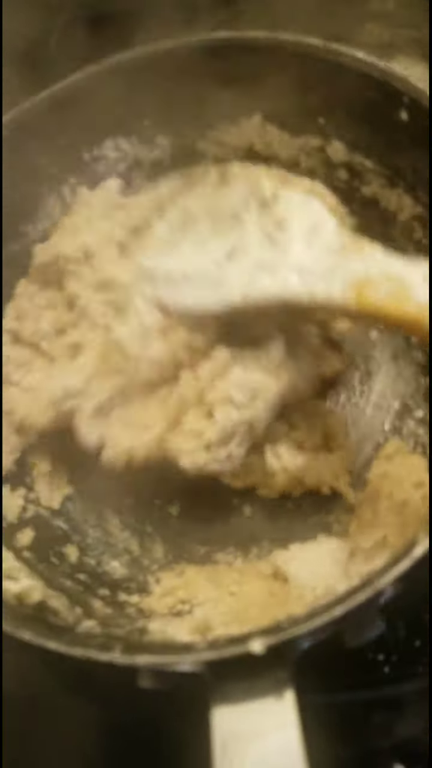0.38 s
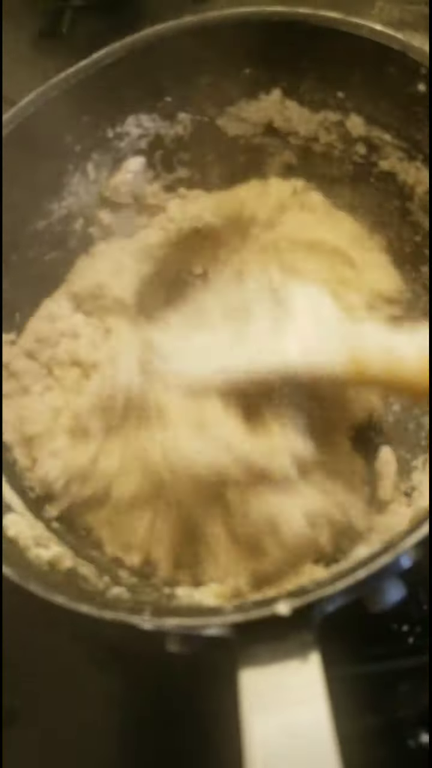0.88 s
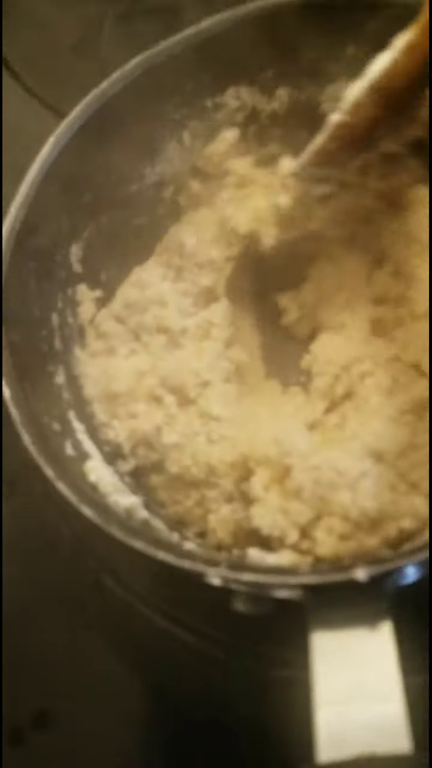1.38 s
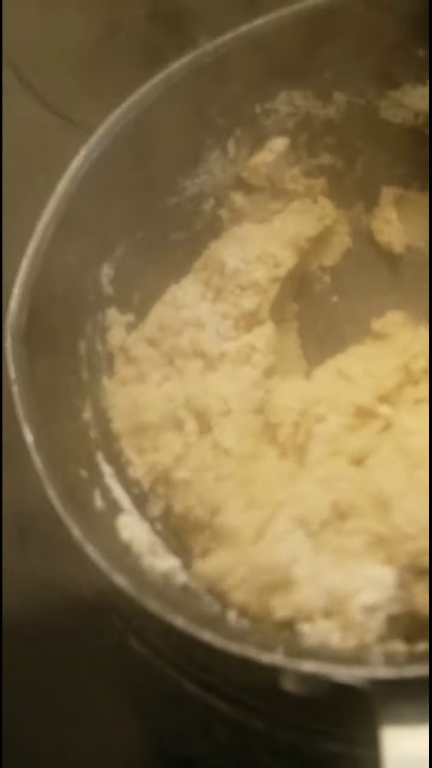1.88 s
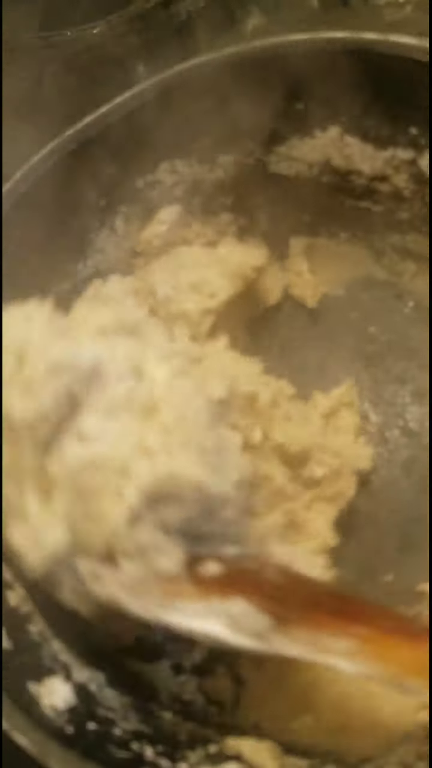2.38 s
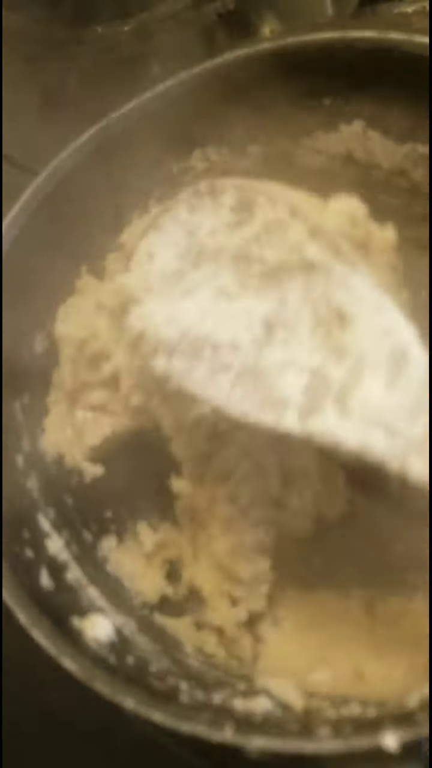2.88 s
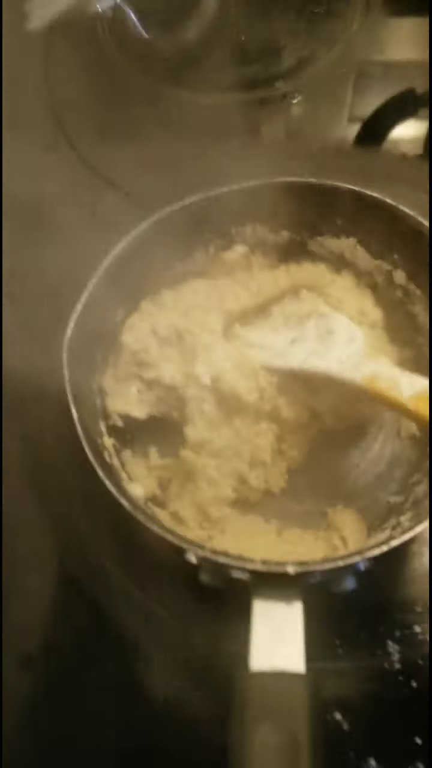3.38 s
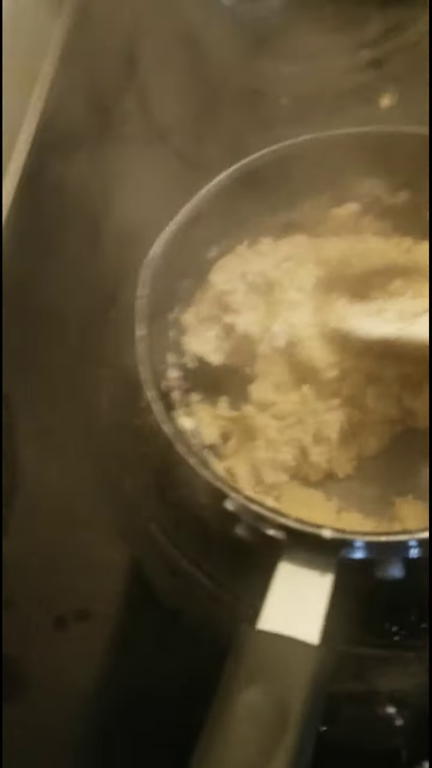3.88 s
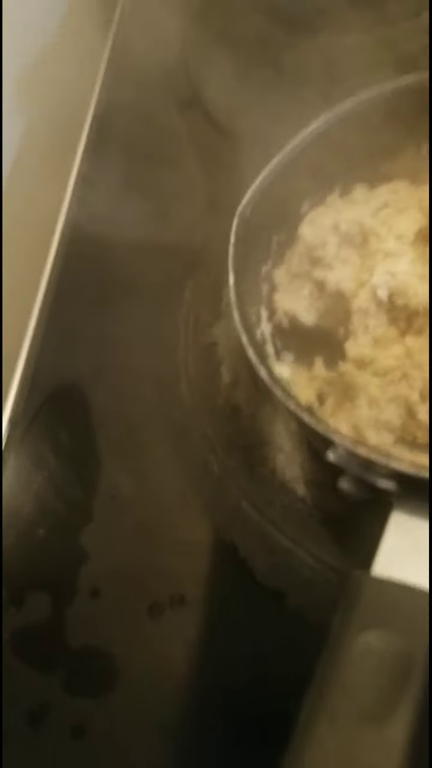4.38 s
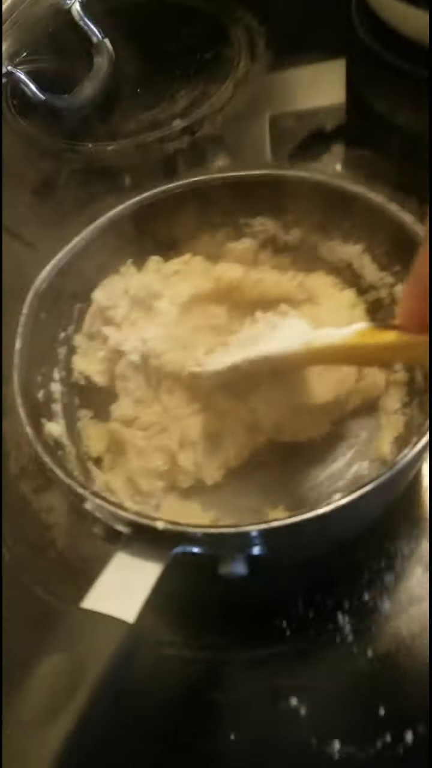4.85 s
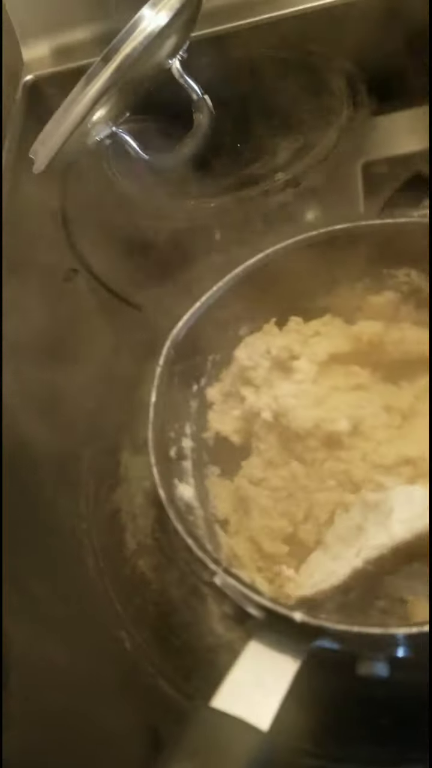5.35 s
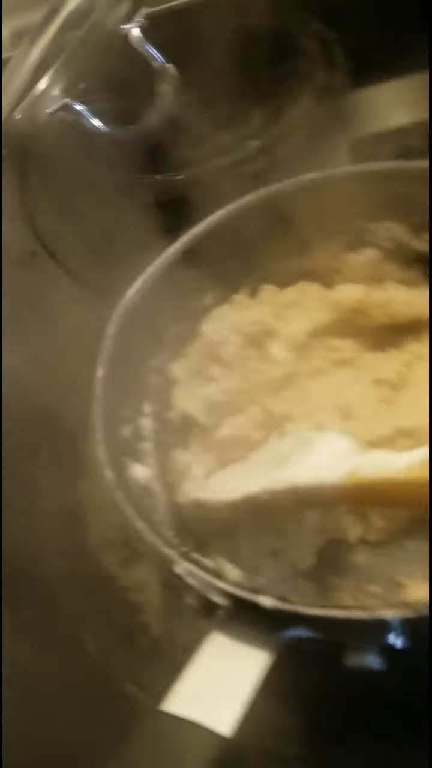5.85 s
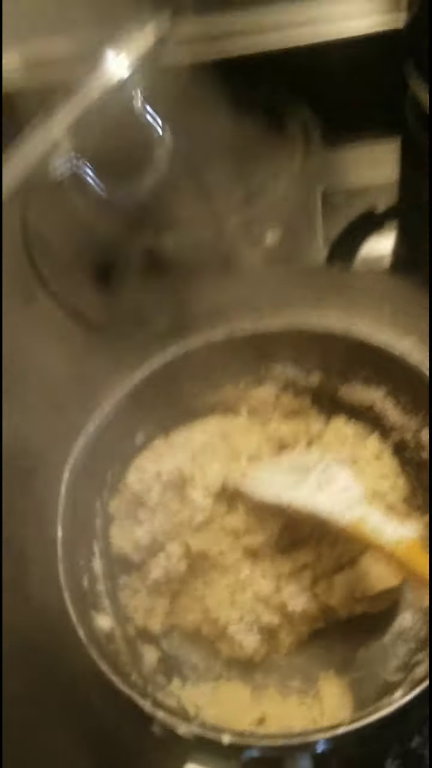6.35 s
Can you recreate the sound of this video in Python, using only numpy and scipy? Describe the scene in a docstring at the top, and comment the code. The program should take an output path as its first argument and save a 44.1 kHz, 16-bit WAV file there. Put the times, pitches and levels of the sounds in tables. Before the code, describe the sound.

A wooden spatula knocks a small ringing steel saucepan in uneven clusters, scraping through a sizzling thick mixture over a low extractor fan hum.

```python
"""Stirring a thick, hot mixture

A wooden spatula knocks on a small steel saucepan on a glass hob, each blow ringing the pan's modes
in a wash of rattle. The blade scrapes the bottom as dense slips coloured by the pan.
The mixture sizzles as thousands of tiny bursts, with single louder spits. Behind it an extractor fan
hums on the orders of its rotor over a rush of air. A small stereo microphone pair is close above."""
import sys
import numpy as np
from scipy import signal
from scipy.io import wavfile

SR = 44100
rng = np.random.default_rng(int(sys.argv[2]) if len(sys.argv) > 2 else 0)


def invert_db(x):
    """Field ratio 10**(x/20) for x, a level in decibels (scalar or array-like)."""
    u = np.asarray(x, float) / 20
    return 10 ** u


def digitize_waveform(pressure):
    """Quantize a signal to 16-bit integers and store it at the path in sys.argv[1].

    Rows of a 2-D input are taken as channels; values are limited to [-1, 1].
    """
    field = np.atleast_2d(pressure).T
    bounded = np.clip(field, -1, 1)
    quanta = np.round(bounded * 32767).astype(np.int16)
    wavfile.write(sys.argv[1], SR, quanta)


N = 297127   # length in samples

EDGES = 28 * 2 ** np.arange(0, 9.4, .4)   # band edges in Hz, 0.4 octave apart
CENTRES = np.sqrt(EDGES[1:] * EDGES[:-1])
PAN_LAG_S = .00011   # the pan is heard this much later on the right


def rms_one(x):
    """Scales a signal to rms 1."""
    return x / np.sqrt(np.mean(x ** 2) + 1e-20)


def in_time(rows):
    """Draws the columns of a timed curve sample by sample."""
    s, *columns = np.transpose(rows)
    return [np.interp(np.arange(N) / SR, s, column) for column in columns]


def at_hz(points, hz):
    """Reads a table on a log-frequency axis."""
    table_hz, values = np.transpose(points)
    return np.interp(np.log(hz), np.log(table_hz), values)


def every_sample(slow):
    """Fills in between values given at every 40th sample."""
    return np.interp(np.arange(N) / 40, np.arange(len(slow)), slow)


def drift(rate_hz):
    """Slow random wander of spread 1: noise through two equal low-pass poles."""
    r = np.exp(-80 * np.pi * rate_hz / SR)
    white = rng.standard_normal(N // 40 + 2002)
    slow = signal.lfilter([1], [1, -2 * r, r * r], white)[2000:]   # without the filter's start
    return every_sample(rms_one(slow))


def grains(per_s, spread_db):
    """Four unrelated trains of random clicks of uneven size, rms 1."""
    uneven_db = spread_db * np.minimum(rng.exponential(1, (2, 2, N)), 5)
    sizes = invert_db(uneven_db) * rng.standard_normal((2, 2, N))
    return rms_one(sizes * (rng.random((2, 2, N)) < per_s / SR))


def later(x, s):
    """Delays x by s seconds."""
    return np.interp(np.arange(N) - s * SR, np.arange(N), x)


def bands(white, likeness, lag_s):
    """Stereo bands of a white source; the right side is partly a late copy of the left."""
    for k, edges in enumerate(zip(EDGES, EDGES[1:])):
        sos = signal.butter(2, edges, "band", fs=SR, output="sos")
        left, other = signal.sosfilt(sos, white[k % 2])   # neighbouring bands are unrelated
        alike = np.clip(at_hz(likeness, CENTRES[k]), 0, 1)
        right = alike * later(left, lag_s) + np.sqrt(1 - alike ** 2) * other
        yield CENTRES[k], np.array([left, right])


def ring(drive, hz, t60):
    """Two-pole resonator: a unit click sets a dying sine of height 1 ringing."""
    r, w = invert_db(-60 / (t60 * SR)), 2 * np.pi * hz / SR
    return signal.lfilter([0, np.sin(w)], [1, -2 * r * np.cos(w), r * r], drive + 1e-18)


def panned(pan_db):
    """Left and right gains for a left-over-right difference in dB."""
    return invert_db(np.array([[.5], [-.5]]) * pan_db)


def swells(rows, rise_db_per_s):
    """Power of each event at every 40th sample: steady rise, hold, steady release."""
    s, db, hold, release = np.transpose(rows)[:4, :, None]
    t = np.arange(N // 40 + 2) * 40 / SR - s
    return invert_db(db + rise_db_per_s * np.minimum(t, 0) - release * np.maximum(t - hold, 0)) ** 2


# Blows of the spatula. Each row: start in seconds (before the short delay ONSET_DELAY_S), level in dB,
# thud in dB against the level, hardness in dB against the level, length factor of the ringing.
KNOCKS = [(0.141, -18, -11, -2, 0.15), (0.157, -27.5, -8, -11, 0.51), (0.465, -42.5, -0.5, -26, 0.57),
          (0.532, -37, -2, -33, 0.99), (0.717, -46, 11, -20, 0.3), (0.871, -21.5, -15, -2.5, 0.4),
          (0.923, -47.5, -1, 1, 0.51), (1.019, -34, 0.5, -12, 0.62), (1.032, -38.5, 2.5, -3.5, 0.88),
          (1.073, -19, -11, -14, 0.69), (1.081, -18.5, -5.5, 1, 0.2), (1.357, -27.5, -9.5, -28, 0.65),
          (2.03, -63.5, 14.5, -11, 0.67), (2.296, -51.5, 2, 3, 0.6), (2.866, -33, -9.5, -9.5, 0.63),
          (3.191, -52, 6, -26, 0.29), (3.26, -33.5, -31, -5, 0.14), (3.497, -47, -8, -21, 0.93),
          (3.795, -12, -12.5, -1, 0.69), (3.821, -13.5, -10.5, 1, 0.31), (3.887, -38.5, -6, -1, 0.96),
          (4.118, -17.5, -8.5, 0, 0.47), (4.14, -22.5, -13, -5.5, 0.25), (4.89, -49.5, -4, 1, 0.26),
          (5.364, -34.5, -12, -16, 0.55), (5.384, -30, 3.5, -12.5, 0.43), (5.948, -55, -16.5, 6.5, 0.37),
          (6.518, -40.5, -5, -0.5, 0.21), (6.601, -33, -7.5, -20, 0.86), (6.665, -13, -8, -2, 0.69),
          (6.6747, -19, -11, -0.5, 0.57), (6.699, -16, -23, -12, 0.69)]
# Hard blows that ring free of the mixture crack most; blows cushioned by it are dull.
CRACK_DB, CRACK_PER_HARDNESS, CRACK_PER_LENGTH_DB, CRACK_PER_THUD = -13.5, 2.36, 15, 0.53


def blow_db(hz):
    """Strength of every knock at one pitch: soft blows are all thud, hard ones crack."""
    strength_db = []
    for s, db, thud, hard, length in KNOCKS:
        crack_db = CRACK_DB + CRACK_PER_HARDNESS * hard + CRACK_PER_LENGTH_DB * length - CRACK_PER_THUD * thud
        spectrum = [(170, thud + 8), (550, 0), (1800, hard + 2), (7000, crack_db)]
        strength_db.append(db + at_hz(spectrum, hz))
    return np.array(strength_db)


# Ringing modes of the pan, also stirred by the scrape. Each row: pitch in Hz, level in dB, T60 in seconds.
PAN_MODES = [(152.4, 18.5, 0.099), (231, 12, 0.27), (303, -3, 0.54), (355.7, 13, 0.24), (398, -16, .2),
             (474.7, 12, 0.35), (491.3, 14, 0.3), (584, 3.5, 0.25), (680, 5.5, 0.5), (805, 3.5, 0.55),
             (875, -6, 0.35), (980, -21, .1), (1093, -6.5, 0.11), (1355, -1, 0.63), (1580, -4, 0.11),
             (1811, 11.5, 0.067), (1741, 15.5, 0.19), (1970, 9, 0.15), (2008, 16.5, 0.089),
             (2380, -2, 0.092), (2490, 3.5, 0.23), (2800, -1, 0.25)]
# Spectrum of the blows. Each row: pitch in Hz, level in dB.
KNOCK_COLOUR = [(47, -38.5), (80, -8.5), (227, -0.5), (303, -6), (482, -8.5), (538, -7), (702, -9.5),
                (1000, -12.5), (1990, -12), (3100, -18.5), (13100, -29), (15000, -33.5), (16000, -54)]
# Decay of the rattling wash. Each row: pitch in Hz, T60 in seconds before the length factor.
KNOCK_DECAY = [(100, 0.36), (300, 0.29), (1000, 0.35), (3000, 0.28), (8000, 0.18), (15000, 0.17)]
# Width of the pan's sounds. Each row: pitch in Hz, left-right likeness from 0 to 1.
NEAR_LIKENESS = [(100, 1), (500, 0.64), (1500, 0.067), (8000, 0.14)]
# Balance of knocks and scrape. Each row: pitch in Hz, left over right in dB.
PAN_BALANCE = [(60, 4), (110, -3), (200, -6.5), (380, 1), (700, -4), (1290, -3), (2380, 4), (4400, 0.5),
               (8120, 6.5), (15000, 1)]
ONSET_DELAY_S = .0015   # every blow sounds this long after its listed start
ROOM_DB, ROOM_T60_S = -16, 0.52
MODE_CHANCE_DB = 2.0   # random spread of each mode's level


def knocks():
    """Each blow is a sharp pulse that rings the modes and rattles pan and hob: a wash dying band by band."""
    t = np.arange(SR // 2) / SR
    out, rung = np.zeros((2, N)), np.zeros((2, N + len(t)))
    at = [round((row[0] + ONSET_DELAY_S) * SR) for row in KNOCKS]
    length = np.array(KNOCKS)[:, 4]
    room = invert_db(ROOM_DB - 60 * t / ROOM_T60_S)
    for k, (hz, noise) in enumerate(bands(rng.standard_normal((2, 2, N)), NEAR_LIKENESS, PAN_LAG_S)):
        power, clicks = np.zeros(N + len(t)), np.zeros((2, N))
        rise = 1 - np.exp(-t * hz / 0.74)   # lows take a cycle or two to build
        crack = 1.93 * np.exp(-t / 0.0039) * np.clip(hz / 1200, 0, 1)   # the dry wooden tap
        strength_db = blow_db(hz)
        for i, db, factor in zip(at, strength_db, length):
            wash = invert_db(-60 * t / (factor * at_hz(KNOCK_DECAY, hz)))
            power[i:i + len(t)] += (invert_db(db) * rise * (wash + room + crack)) ** 2
        clicks[:, at] = invert_db(strength_db + 19.5) * (-1) ** k
        pulse = ring(clicks, hz, 13.8 / hz) * hz / SR   # first contact, a few cycles long
        pulse[1] = later(pulse[1], PAN_LAG_S)
        side = panned(at_hz(PAN_BALANCE, hz))
        out += invert_db(at_hz(KNOCK_COLOUR, hz) + 17.5) * side * (np.sqrt(power[:N]) * noise + pulse)

    hz, level_db, t60 = np.transpose(PAN_MODES)[:, :, None]
    luck = rng.standard_normal((len(at), 4, len(PAN_MODES), 1))
    strength_db = np.transpose([blow_db(mode[0]) for mode in PAN_MODES])[:, :, None]
    for i, db, factor, (loud, sign, pitch, apart) in zip(at, strength_db, length, luck):
        start_db = db + level_db - 18.5 + MODE_CHANCE_DB * loud
        fading = invert_db(start_db - 60 * t / (factor * t60))   # the mixture damps some blows more
        phase = 2 * np.pi * hz * (1 + .006 * pitch) * t
        lag = 2 * np.pi * hz * PAN_LAG_S + apart * hz / 900   # sides differ more in phase at high modes
        rung[:, i:i + len(t)] += np.sum(np.sign(sign) * fading * np.sin([phase, phase - lag]), axis=1)
    return out + rung[:, :N]


# Strokes of the blade. Each row: full pressure at seconds, level in dB, hold in seconds,
# release in dB per second, brightness in dB per octave.
STROKES = [(0.0, -54, 0.0042, 210.5, 7), (0.129, -49, 0.0071, 39.5, 2.5), (0.331, -54, 0.0044, 153, 3),
           (0.424, -47, 0.0075, 35, 1.5), (0.658, -41.5, 0.0026, 403, -1.2), (0.721, -46, 0.0018, 135, 0.5),
           (0.846, -49, 0.019, 61.5, 4.5), (1.052, -32.5, .15, 331.5, 1), (1.281, -52.5, 0.039, 83, 3.5),
           (1.463, -44.5, 0.0045, 162, 2.5), (1.732, -48.5, 0.0086, 70.5, 1), (1.979, -51, .24, 57, 4),
           (2.276, -49, .005, 99.5, 2.5), (2.429, -52.5, 0.076, 74.5, -1.5),
           (2.924, -55.5, 0.048, 40.5, 6.5), (3.274, -53, 0.14, 217, 6.3), (3.584, -52, 0.0022, 281.5, 4),
           (3.755, -56, 0.012, 65, -6), (4.564, -54, .05, 50.5, 0.5), (4.705, -48, 0.0065, 159, 2),
           (4.845, -55.5, 0.036, 54, 2.5), (4.937, -42, 0.035, 251.5, 1.5), (5.033, -52, .05, 101.5, -1),
           (5.145, -55.5, .045, 200, -8), (5.794, -59, 0.07, 406, 12.5), (5.955, -46.5, 0.034, 300, 9),
           (6.007, -40, .04, 108.5, 2.5), (6.15, -54.5, 0.091, 87, -2.5), (6.367, -44, 0.017, 301.5, 0.2),
           (6.424, -38.5, .04, 149, -1.9), (6.463, -42, 0.027, 259, -11.5)]
# Shared level curve of light drag, simmer and fan. Each row: time in seconds, level in dB.
HEARD = [(0.0, 2.5), (0.25, -0.5), (0.4, 0.5), (1.5, 0), (2.0, -1), (2.4, -0.1), (3.77, 0.1), (3.9, -0.5),
         (4.7, -8.5), (6.2, -5), (6.58, -0.5)]
STROKE_RISE_DB_PER_S, BRIGHT_RISE_DB_PER_S = 232.5, 26   # bright strokes bite faster
DRAG_DB, DRAG_BRIGHTNESS_DB, DRAG_WANDER_DB = -56.5, -2, 3.5   # the blade drags lightly between strokes
RUB_HZ, RUB_SINKS_HZ_PER_DB, RUB_WANDER_HZ = 1778, 20.5, 69.77   # the rub drops in pitch under pressure


def pressure():
    """Scrape level, brightness and rub pitch from the strokes over the light drag."""
    brightness = np.array(STROKES)[:, 4]
    rise = STROKE_RISE_DB_PER_S + BRIGHT_RISE_DB_PER_S * np.maximum(brightness[:, None], 0) ** 1.4
    power = swells(STROKES, rise)
    drag = invert_db(DRAG_DB + in_time(HEARD)[0] + DRAG_WANDER_DB * drift(5.84)) ** 2
    total = every_sample(power.sum(axis=0)) + drag
    tilt_db = (every_sample(brightness @ power) + DRAG_BRIGHTNESS_DB * drag) / total   # weighted by power
    level_db = 10 * np.log10(total)
    rub_hz = RUB_HZ - RUB_SINKS_HZ_PER_DB * (level_db - DRAG_DB) + RUB_WANDER_HZ * drift(5.0)
    return level_db, tilt_db, rub_hz


# Spectrum of the scrape through the pan's bottom. Each row: pitch in Hz, level in dB.
SCRAPE_COLOUR = [(88, -48), (150, -17), (307, -23), (362, -8), (414, -8.5), (473, 7), (638, -16.5),
                 (682, -2), (1300, -3), (4250, -18.5), (8000, -52), (10400, -45), (17600, -120)]
JUDDER_DB, JUDDER_PER_S = 1.14, 77   # the blade catches and lets go
RUB_WIDTH_HZ, RUB_DB, RUB_PER_BRIGHTNESS = 250, -10, 1   # the rub stands out in bright strokes


def scrape():
    """Dense slips of the blade colour through the pan's bottom and keep its modes stirring."""
    level_db, tilt_db, rub_hz = pressure()
    slips, rasp, together = grains(4000, spread_db=0.5), 0, drift(18.0)
    for hz, rub in bands(slips, NEAR_LIKENESS, PAN_LAG_S):
        shape_db = at_hz(SCRAPE_COLOUR, hz) + tilt_db * np.clip(np.log2(hz / 1200), -2.2, 2.2)
        flicker_db = 0.54 * together + 0.75 * drift(4.7)
        rasp = rasp + rub * panned(at_hz(PAN_BALANCE, hz)) * invert_db(shape_db + flicker_db)

    rung = rms_one(sum(invert_db(db) * ring(slips[0, 0], hz, t60) for hz, db, t60 in PAN_MODES))
    rung = np.array([rung, later(rung, PAN_LAG_S)])

    wobble = signal.sosfilt(signal.butter(2, RUB_WIDTH_HZ / 2, fs=SR, output="sos"), slips)
    phase = 2 * np.pi * np.cumsum(rub_hz) / SR   # the rub gathers round one moving pitch
    focus = rms_one(wobble[0] * np.cos(phase) + wobble[1] * np.sin(phase))
    focus_gain = invert_db(RUB_DB + RUB_PER_BRIGHTNESS * tilt_db)

    gain = invert_db(level_db + JUDDER_DB * drift(JUDDER_PER_S))
    return gain * (rms_one(rasp) + focus_gain * focus + invert_db(-4.5) * rung)


# Flares where the hot bottom is bared. Each row: full at seconds, level in dB, hold in seconds,
# release in dB per second.
FLARES = [(0.0, -52.5, 0.023, 40), (0.108, -46.5, 0.043, 52), (0.512, -43.5, 0.017, 43),
          (0.71, -47.5, 0.016, 123), (0.828, -52, .005, 104), (0.944, -52, .02, 60), (1.04, -45, 0.03, 100),
          (1.144, -43.5, 0.022, 116), (1.27, -51.5, 0.096, 49), (1.384, -46.5, 0.0058, 53.5),
          (1.694, -47.5, 0.0048, 113), (1.9, -49.5, 0.12, 142), (2.132, -54, 0.0041, 197),
          (2.266, -51, 0.28, 54.5), (2.904, -48, 0.006, 170), (3.004, -52, 0.0039, 152),
          (3.316, -44.5, .01, 74), (3.51, -70, 0.027, 60), (3.564, -42, 0.006, 126.5),
          (3.704, -55, .02, 120), (4.602, -51.5, 0.0043, 89.5), (4.78, -54, 0.032, 53),
          (4.848, -56.5, 0.0046, 67), (4.944, -54.5, 0.0031, 130), (5.058, -54.5, 0.0082, 174),
          (5.402, -56, 0.0044, 122), (5.794, -58, 0.062, 110), (5.965, -49, .005, 50),
          (6.061, -68, 0.0049, 94), (6.215, -51.5, 0.0044, 75), (6.446, -46, 0.0043, 71),
          (6.655, -49, 0.031, 51)]
# Spectrum of the sizzle. Each row: pitch in Hz, level in dB.
SIZZLE_COLOUR = [(1180, -25), (2000, -7.5), (2300, -6), (2510, -7), (2860, -7.5), (3710, -8), (4380, -14.5),
                 (5030, -3.5), (7190, -8), (9010, -2), (12200, -10), (14900, -8), (16000, -17)]
# Where the sizzle lies. Each row: time in seconds, left over right in dB.
SIZZLE_SIDE = [(0.0, 4.5), (0.45, 9), (1.05, 9.5), (1.35, 4.5), (1.65, 11.5), (1.92, -1), (2.1, 9.5),
               (2.8, 3), (3.15, 10), (3.35, -0.5), (3.7, 2), (4.5, 6), (4.9, 4), (5.75, 6.5), (5.95, 7),
               (6.02, 3.5), (6.7, 1)]
# Bursting droplets. Each row: start in seconds, level in dB, left over right in dB.
SPITS = [(0.633, -31, 19), (0.6603, -31, 17), (0.693, -39, 11), (0.7107, -33.5, 27), (0.7517, -26.5, 7),
         (0.824, -37, -14), (1.433, -30, 7), (1.89, -34, 6), (2.0557, -34, 21), (2.0782, -38, 4),
         (2.092, -26.5, 7), (2.1046, -34, 10), (3.5006, -45, 12), (3.557, -25, 9), (3.5648, -21, -6.5),
         (3.684, -27, -10), (3.706, -20, 6.5), (5.026, -41, 4), (5.0643, -37, 3), (6.0673, -37.5, 16),
         (6.55, -33, -3)]
FLARE_RISE_DB_PER_S, SIMMER_DB = 153, -54


def sizzle():
    """Thousands of tiny bursts at the hot bottom, and a few louder spits of fast-dying noise."""
    (side_db,), (heard_db,) = in_time(SIZZLE_SIDE), in_time(HEARD)
    flare_power = every_sample(swells(FLARES, FLARE_RISE_DB_PER_S).sum(axis=0))
    level = np.sqrt(flare_power + invert_db(SIMMER_DB + heard_db) ** 2)
    bursts, together, fizz = grains(12000, spread_db=3.5), drift(43), 0
    for hz, band in bands(bursts, NEAR_LIKENESS, PAN_LAG_S):
        if hz > 1500:
            fizz = fizz + invert_db(at_hz(SIZZLE_COLOUR, hz) + 0.24 * together + 2.1 * drift(19.0)) * band

    spits = np.zeros((2, N))
    for s, db, pan_db in SPITS:
        spits[:, round(s * SR)] = invert_db(db + 3) * panned(pan_db)[:, 0]
    fade = signal.lfilter([1], [1, -np.exp(-1 / (0.00053 * SR))], spits)   # about half a millisecond
    spit_noise = fade * rng.standard_normal((2, N))
    spit_noise = signal.sosfilt(signal.butter(2, 4500, "high", fs=SR, output="sos"), spit_noise)
    return invert_db(1.5) * level * panned(side_db) * rms_one(fizz) + spit_noise


# Hum of the fan. Each row: multiple of the rotor's turning rate, level in dB.
ROTOR_ORDERS = [(1, -18), (2, -9), (3, 2), (4, 0.5), (5, 4), (6, -1.5), (7, -12), (8, -10.5), (9, -42.5),
                (10, -40), (11, -15.5), (12, -37), (13, -11.5), (14, -17), (15, -14), (16, -19)]
# Spectrum of the fan's air stream. Each row: pitch in Hz, level in dB.
AIR = [(15, -48), (25, 1.5), (106, 7), (184, -15.5), (281, -9.5), (387, -15), (631, -24), (780, -1.5),
       (1120, -27), (1640, -13), (1820, -5), (2160, -26), (4000, -24), (5200, -75), (8800, -120)]
# Width of the air stream. Each row: pitch in Hz, left-right likeness from 0 to 1.
FAR_LIKENESS = [(40, 1), (150, 1), (500, 0.34), (1500, 0.088), (8000, 0.11)]
ROTOR_HZ, FAN_DB = 20.0, -44.5


def fan():
    """Wavering sines on the rotor's orders over the filtered-noise rush of air."""
    level_db = FAN_DB + in_time(HEARD)[0]
    turn = 2 * np.pi * np.cumsum(ROTOR_HZ * (1 + 0.0023 * drift(1.78))) / SR
    sides = np.array([[0], [.6]])   # phase in radians, left and right
    hum, air = 0, 0
    for k, db in ROTOR_ORDERS:
        gain = invert_db(db + 1.35 * drift(8.3))
        hum = hum + gain * np.sin(k * turn + 0.15 * k * k + 1.2 * drift(1.87) + sides)
    for hz, rush in bands(rng.standard_normal((2, 2, N)), FAR_LIKENESS, 0):
        if hz < 5000:
            air = air + invert_db(at_hz(AIR, hz) + 2.3 * drift(15)) * rush
    return invert_db(level_db) * (invert_db(2.0) * rms_one(hum) + invert_db(-2.5) * rms_one(air))


def scene():
    """All sources of the kitchen."""
    return knocks() + scrape() + sizzle() + fan()


MIC_DIP_HZ, MIC_DIP_WIDTH_HZ, MIC_DIP_SHARE = 9170, 4300, 0.61
TOP_HZ, TOP_DEPTH_DB = 15750, 50


def low_pass(x):
    """Removes everything above the highest recorded frequency."""
    return signal.sosfilt(signal.butter(12, 16600, fs=SR, output="sos"), x)


def record(dry):
    """The small microphones lose the deepest bass and dip in the treble, peaks are rounded, the top is cut."""
    thin = signal.sosfilt(signal.butter(2, 30, "high", fs=SR, output="sos"), dry)
    dip = signal.lfilter(*signal.iirpeak(MIC_DIP_HZ, MIC_DIP_HZ / MIC_DIP_WIDTH_HZ, SR), thin)
    rounded = 0.98 * np.tanh((thin - MIC_DIP_SHARE * dip) / 1.227)
    mix = signal.sosfilt(signal.cheby2(14, TOP_DEPTH_DB, TOP_HZ, fs=SR, output="sos"), rounded)
    return low_pass(mix)


dry = scene()
out = record(dry)
digitize_waveform(out)
```